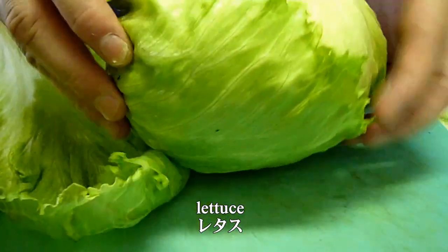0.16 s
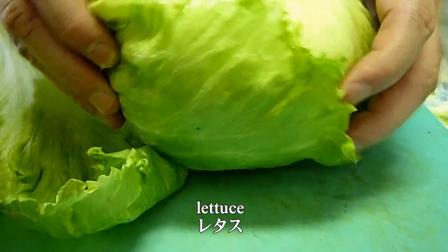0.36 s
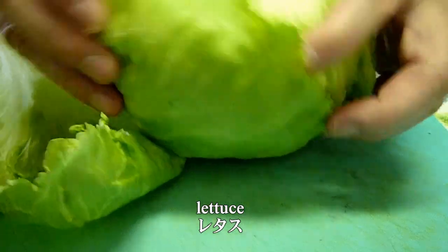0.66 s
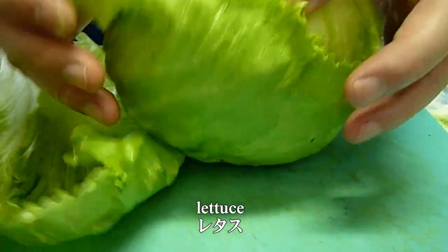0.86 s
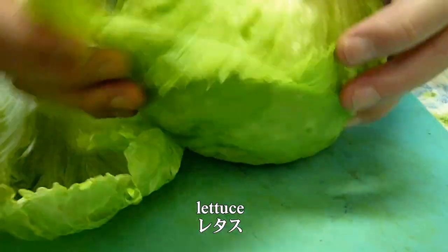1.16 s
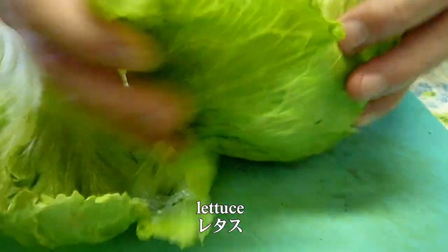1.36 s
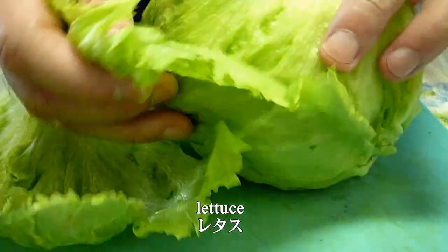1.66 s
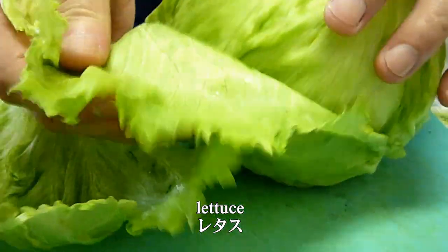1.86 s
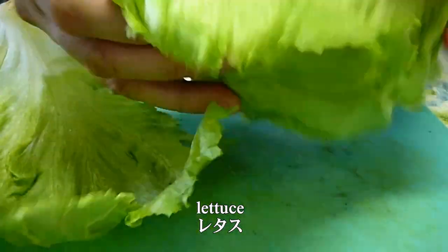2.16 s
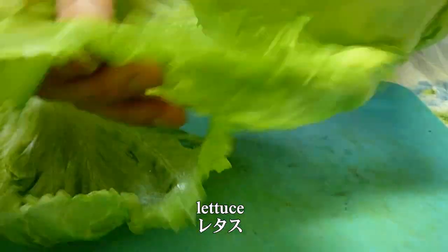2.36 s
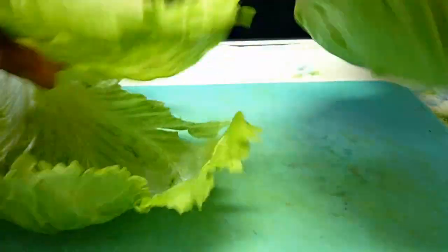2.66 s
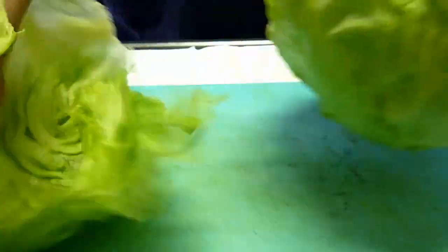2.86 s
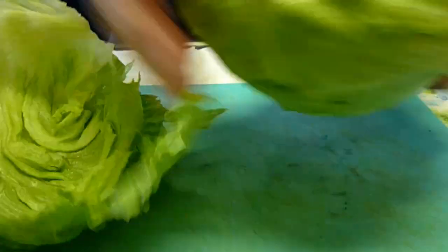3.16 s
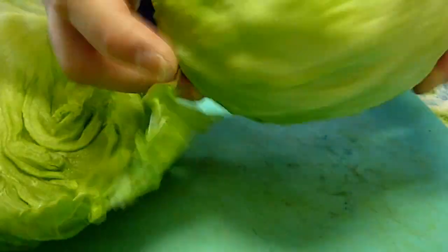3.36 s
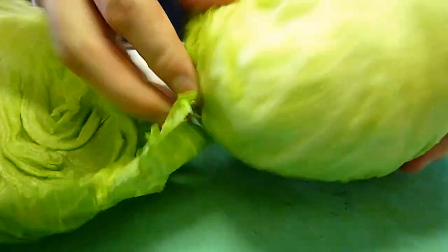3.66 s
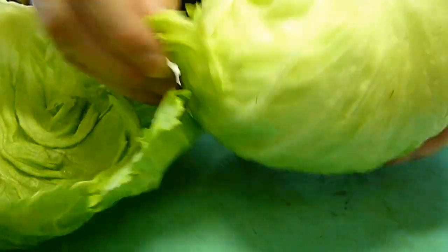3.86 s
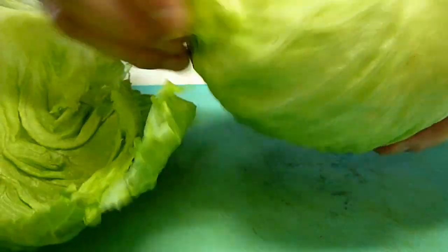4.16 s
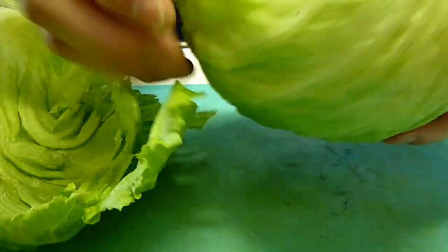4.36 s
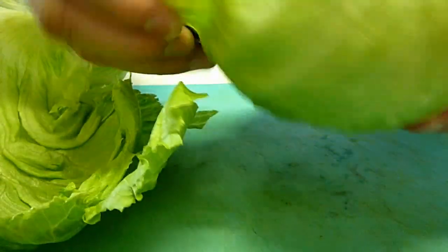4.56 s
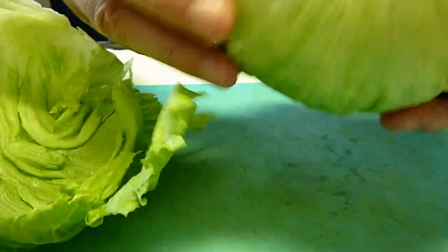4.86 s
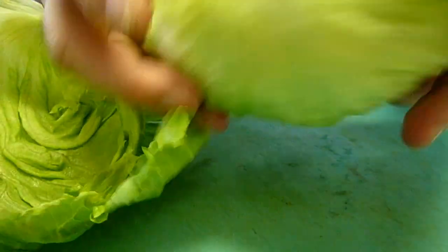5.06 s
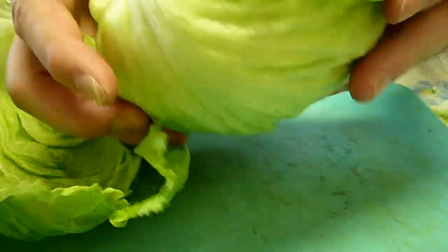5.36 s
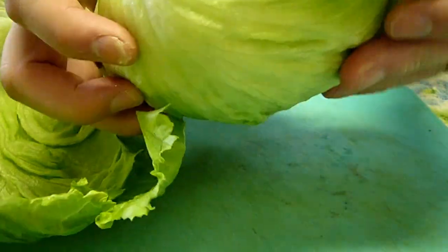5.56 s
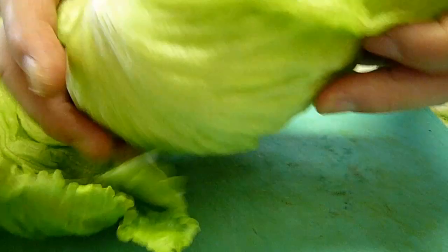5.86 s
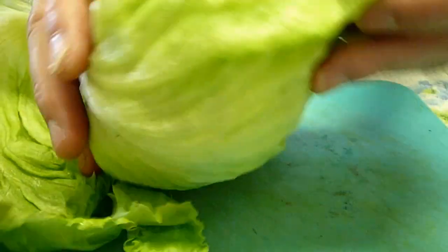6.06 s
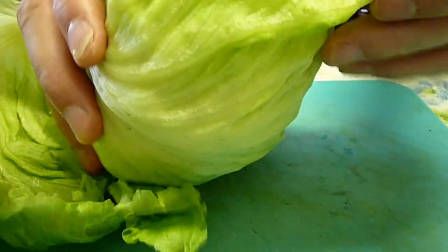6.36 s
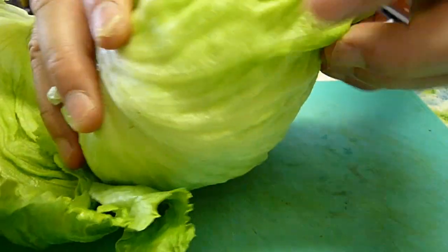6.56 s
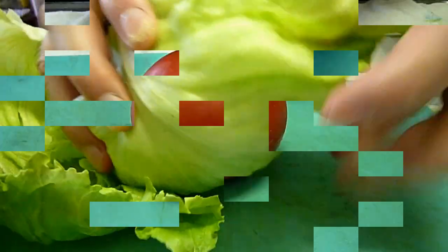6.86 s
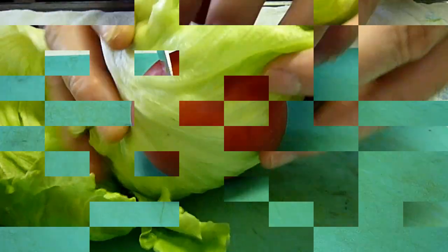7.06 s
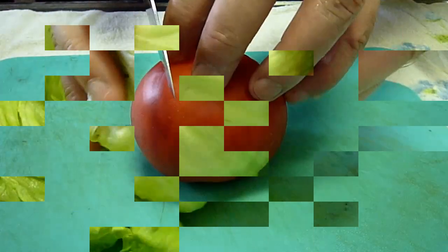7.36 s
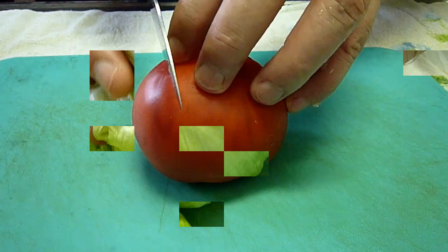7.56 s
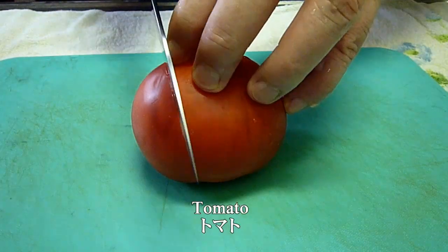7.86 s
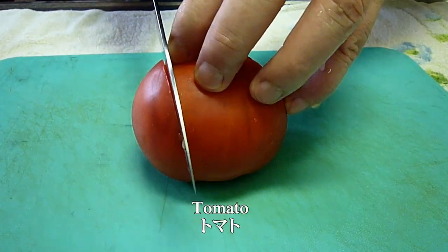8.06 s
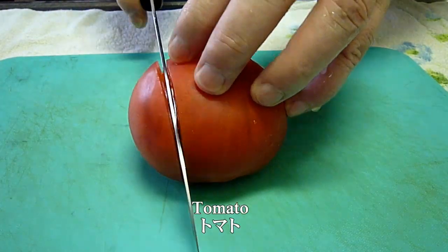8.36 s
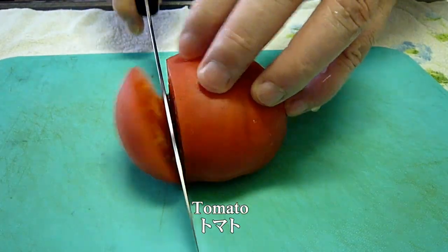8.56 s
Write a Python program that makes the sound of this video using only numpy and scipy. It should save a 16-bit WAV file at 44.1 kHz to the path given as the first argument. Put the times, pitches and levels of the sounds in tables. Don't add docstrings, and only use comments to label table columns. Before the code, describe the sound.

In a small, fairly dry kitchen, lettuce leaves crackle and tear under restless hands, busy at first, then sparser with sharp snaps and a loud brief squeak. The head bumps and groans on the board. The last leaf rips in little jerks. After a brief mute, a quiet blade drags through tomato flesh and ends in a thud and scrape. Steady low hum, slightly gritty compressed camera sound.

```python
import sys
import numpy as np
from scipy import signal
from scipy.fft import rfft, irfft, dct, next_fast_len
from scipy.io import wavfile
from scipy.ndimage import map_coordinates

SR = 44100
rng = np.random.default_rng(int(sys.argv[2]) if len(sys.argv) > 2 else 0)


def wav_out(sig):
    wavfile.write(sys.argv[1], SR, np.round(np.clip(np.atleast_2d(sig).T, -1, 1) * 32767).astype(np.int16))


def rack_gain(trim_db):
    fader = np.asarray(trim_db, float)
    return 10 ** (fader / 20)


N = 384111

# start_s, length_s, creak_db,
# crispness_db
LEAF_PULLS = [(.0, 0.059, -41.5, -9), (0.101, 0.034, -44.5, -3.5), (0.142, 0.012, -48, -7),
              (0.213, 0.012, -50.5, -0.5), (0.264, 0.089, -46, -5.5), (0.458, 0.13, -53, -4.5),
              (0.655, 0.04, -51, -5), (.71, .04, -49, 0), (.76, .04, -52, 0), (0.802, 0.062, -45.5, -4.5),
              (0.882, 0.032, -51.5, -4), (0.96, 0.042, -61.5, 2), (1.064, 0.034, -55, 0),
              (1.144, 0.017, -41, -4), (1.175, 0.038, -44, -4), (1.249, 0.045, -48, -6),
              (1.344, 0.016, -49.5, -5.5), (1.526, 0.047, -37, -5), (1.633, 0.018, -55, 8.5),
              (1.677, 0.13, -55.5, -4), (1.884, 0.023, -48, -6.5), (2.032, 0.035, -56.5, -5.5),
              (2.196, 0.05, -36, -5.5), (2.25, 0.11, -41.5, -3), (2.331, 0.015, -41, -1),
              (2.382, 0.011, -34.5, -4.5), (2.606, 0.14, -63.5, -7), (2.812, 0.053, -56, -8.5),
              (2.882, 0.074, -48.5, -10),
              (3.318, 0.008, -43.5, -7), (3.444, 0.038, -63, 0), (3.655, 0.013, -37, -20.5),
               (3.709, 0.017, -61, 2.5), (3.742, 0.0095, -44.5, 5), (3.749, 0.056, -36, -9),
               (3.91, 0.023, -47.5, -2.5), (3.961, 0.051, -53.5, 1), (4.003, 0.014, -44.5, -4),
               (4.118, 0.031, -63.5, 12.5), (4.208, 0.021, -51, -8), (4.272, 0.044, -50, -1),
               (4.309, 0.023, -39.5, -1.5), (4.531, 0.029, -66, -11), (4.641, 0.0078, -41.5, -3),
               (4.648, 0.034, -48, 2.5), (4.804, 0.066, -50.5, 3), (4.91, 0.023, -50.5, -7),
               (4.967, 0.064, -61, 0.5), (5.24, 0.011, -55.5, 2.5), (5.359, 0.013, -55.5, -10),
              (5.451, 0.016, -56, -2), (5.521, 0.0097, -53.5, -1), (5.581, 0.039, -51.5, -6.5),
              (5.669, 0.019, -48, -8), (5.728, 0.043, -48, -6), (5.832, 0.0084, -49, 1.5),
              (5.919, 0.022, -44.5, -3.5), (5.961, 0.021, -50.5, -6), (6.004, 0.043, -49.5, -3),
              (6.078, 0.018, -45, -4.5), (6.2, 0.04, -52, -7), (6.325, 0.0099, -55, -3),
              (6.384, 0.014, -49, -7.5), (6.42, 0.15, -56, -4), (6.517, 0.026, -53.5, -2),
              (6.712, 0.089, -66.5, 7), (6.786, 0.051, -43, -4.5), (6.885, 0.056, -57, -4),
              (7.082, 0.013, -69, -6), (7.147, 0.012, -56.5, 5), (7.235, 0.048, -50, -3)]
# start_s, length_s, creak_db, crispness_db
SAW_STROKES = [
    (7.965, 0.11, -61, -29),
    (8.28, 0.1, -52, -22),
    (8.476, 0.04, -37, -17.5),
    (8.584, 0.034, -51.5, -23),
    (8.437, .03, -50.5, -25),
    (8.657, 0.065, -49, -7),
]
# start_s, length_s, level_db
SHIFTS_ON_BOARD = [(.0, 0.015, -50.5), (0.107, 0.22, -42), (0.16, 0.027, -47), (0.31, 0.02, -54),
                   (0.56, 0.038, -49.5), (0.625, 0.21, -46), (0.81, 0.029, -46), (1.094, 0.11, -43.5),
                   (1.149, 0.027, -39), (1.319, 0.029, -55), (1.536, 0.065, -42), (1.796, 0.012, -52),
                   (2.191, 0.14, -39), (2.38, 0.024, -39), (3.316, 0.012, -45), (3.659, 0.035, -36.5),
                   (3.769, 0.03, -43.5), (3.942, 0.019, -46.5), (4.303, 0.028, -42.5), (4.66, 0.021, -47),
                   (4.806, 0.21, -49.5), (5.607, 0.22, -49.5), (6.036, 0.039, -54.5), (6.377, 0.039, -50),
                   (6.507, 0.057, -47.5), (7.989, 0.053, -52.5), (8.278, 0.077, -41), (8.462, .06, -40.5),
                   (8.646, 0.099, -47)]
# time_s, level_db
HAND_GRIP = [(0, -54.5), (.4, -55), (.9, -60), (1.4, -62), (1.75, -61), (2.1, -60.5), (2.5, -66),
             (3.0, -66), (3.2, -77), (4.0, -60), (4.45, -69), (5.0, -65), (5.45, -68), (5.9, -63.5),
             (6.6, -68.5), (7.0, -73.5), (7.4, -69), (7.7, -75), (8.7, -62.5)]
# centre_hz, width_hz, boost_db
BOARD_RESONANCES = [(420, 140, 13), (896, 23, 9.5), (1060, 43, -1), (1386, 150, 4), (2515, 200, 4.5),
                    (5130, 1500, 4.5)]
# start_s, peak_db, centre_hz, t60_ms
RIB_SNAPS = [(0.2124, -34, 4630, 35), (0.3055, -35, 2500, 10), (1.144, -25.5, 2560, 31.5),
             (1.3489, -32, 5180, 5.9), (1.5387, -29, 3040, 49), (1.637, -23.5, 4300, 26.4),
             (2.2345, -31, 5130, 27), (3.315, -40.5, 4105, 19), (3.79, -38, 2773, 69),
             (3.9225, -31, 2924, 21), (4.1309, -34, 3510, 11), (4.3115, -20.5, 2850, 19),
             (4.6427, -25, 2680, 35), (4.6712, -36, 2540, 14), (4.8117, -32, 5060, 15),
             (4.8195, -27, 4600, 6), (4.8328, -38, 4010, 33), (4.8526, -36, 6200, 28),
             (5.669, -34, 2200, 11), (5.833, -39.5, 5053, 26.7), (5.9239, -33, 3600, 34),
             (6.0206, -33, 3700, 44.5), (6.3748, -39.5, 3170, 20.6), (6.7657, -16, 4900, 5),
             (6.77, -34, 4200, 30), (6.8237, -28, 3500, 8), (6.8349, -29, 4180, 16),
             (7.146, -38, 2740, 13.6), (7.2796, -21, 5370, 12.3)]
# start_s, peak_db, centre_hz, t60_ms
VEIN_TICKS = [(.0385, -34.5, 1500, 10), (.1077, -39, 2500, 12), (.2598, -42, 2300, 10),
              (.2793, -39.5, 2200, 10), (.2857, -41, 2500, 10), (.3371, -36, 1800, 15),
              (.6559, -40, 2200, 10), (.7233, -42.5, 2610, 10), (.7507, -39.5, 2000, 10),
              (.8475, -44, 1800, 10), (1.1194, -40, 2590, 10), (1.1897, -35.5, 1800, 12),
              (1.5085, -36, 1700, 15), (1.8951, -42, 1600, 12), (2.1794, -36, 3500, 12),
              (2.2175, -30.5, 2500, 8), (2.24, -33.5, 1800, 8), (2.281, -29, 1700, 8),
              (2.3245, -35.5, 1500, 8), (2.339, -33, 1500, 10), (3.702, -38, 2600, 8),
              (3.9706, -41, 1800, 10), (3.997, -42, 1800, 6), (4.008, -40, 1600, 15),
              (4.2026, -43.5, 2500, 8), (4.2734, -42.5, 2000, 10), (4.3225, -31, 2500, 12),
              (4.331, -36, 2300, 10), (4.345, -37.5, 2500, 10), (5.5235, -46, 2300, 10),
              (5.688, -42.5, 1800, 10), (5.7141, -45, 1800, 10), (5.752, -36, 2420, 10),
              (5.8249, -45, 2500, 8), (5.8937, -45, 2580, 10), (5.9655, -42, 2000, 12),
              (5.985, -47, 2500, 8), (6.05, -49, 2500, 10), (6.0813, -32, 2000, 14), (6.208, -43, 1800, 12),
              (6.3207, -48, 2830, 10), (7.1515, -39, 3000, 8)]
# start_s, peak_db, pitch_hz, t60_ms
WET_POPS = [(0.037, -47, 968, 110), (0.15, -21.5, 1295, 26), (0.214, -26, 700, 14), (0.8116, -29, 1100, 24),
            (1.153, -28, 1650, 37), (1.155, -25.5, 2675, 18), (4.312, -37, 1190, 28),
            (1.582, -29.5, 517, 110), (2.199, -38, 910, 97), (2.227, -26, 1186, 53), (2.322, -42, 1370, 44),
            (2.382, -33, 1660, 53), (.306, -45, 696, 40), (3.316, -37, 1120, 31), (3.657, -19, 1275, 18),
            (2.228, -30, 800, 40), (2.206, -31, 950, 40), (3.791, -27, 924, 24), (4.01, -41, 1105, 69),
            (4.633, -24.5, 617, 100), (5.669, -41.5, 860, 22), (5.752, -37.5, 824, 12),
            (6.081, -45.5, 645, 26), (6.379, -33, 644, 25), (6.9, -42.5, 442, 36), (7.082, -49, 500, 43),
            (8.59, -44, 1200, 33), (6.383, -36.5, 1970, 18)]
# start_s, peak_db, pitch_hz, t60_ms, spread_octaves
LEAF_SQUEAKS = [
    (4.6437, -14.5, 1419, 23, 0.049),
    (4.2025, -39, 3800, 30, .05),
    (4.139, -34, 3500, 70, .03),
]
# start_s, length_s, peak_db, first_hz, last_hz
STICK_SLIPS = [(0.01, 0.046, -49, 1098, 1010), (1.53, 0.031, -16.5, 400, 460),
               (1.544, 0.037, -14.5, 283.5, 285), (1.546, .034, -25.5, 592, 552),
               (1.551, 0.037, -31.5, 878, 890), (1.53, 0.043, -34, 1716, 1467),
               (2.193, .018, -29.5, 2450, 2420), (2.381, 0.014, -27.5, 1552, 1520),
               (2.383, .013, -39, 2260, 2240), (2.398, 0.0092, -29.5, 1620, 1580),
               (3.7335, .011, -29, 4180, 4230), (3.732, 0.0074, -32, 2530, 2500),
               (3.738, 0.017, -25, 2456, 2520), (3.756, 0.014, -36, 2560, 2420),
               (3.753, 0.027, -25.5, 898, 850), (3.773, 0.017, -23.5, 900, 960),
               (3.762, 0.014, -27, 1383, 1412), (3.777, .028, -27.5, 1320, 1230),
               (3.785, .018, -21, 956, 913), (3.797, .01, -25, 969, 950), (3.808, 0.013, -33, 830, 900),
               (4.129, .01, -27, 3450, 3436), (5.762, 0.032, -38, 910, 858), (5.915, 0.03, -33, 1060, 1062),
               (5.918, .024, -35, 1910, 1925), (5.921, 0.016, -43, 3670, 3570),
               (6.779, 0.019, -41, 1007, 990), (6.803, 0.021, -44.5, 610, 590),
               (6.809, .02, -35, 1740, 1790), (6.833, 0.0081, -36, 1347, 1340),
               (7.239, 0.011, -42.5, 1430, 1390), (7.255, 0.025, -42, 1415, 1400),
               (8.28, 0.07, -47, 1110, 1061), (8.317, 0.092, -30, 239.6, 240),
               (8.489, 0.011, -23, 1200, 1200), (8.489, .011, -30.5, 1946, 1916),
               (8.662, 0.043, -42.5, 1664, 1577),
               (4.831, .012, -33, 3850, 3900), (4.833, .012, -40, 2000, 2200),
                    (4.85, .013, -35, 5000, 5000), (4.85, .012, -35, 7350, 7350),
                    (4.849, .01, -38, 6400, 6400), (4.851, .01, -39, 8700, 8700),
                    (4.85, .014, -39, 2400, 2500), (4.655, .01, -35, 4000, 3900),
                    (4.225, .018, -46, 3750, 3750), (4.31, .006, -30, 5200, 5200),
                    (4.322, .012, -36, 2900, 2500), (5.612, .02, -41, 480, 480),
                    (3.662, .009, -21, 1250, 1200), (3.669, .014, -21, 1150, 1050),
                    (8.497, .022, -10, 185, 165), (6.925, .02, -50, 3500, 3500)]
# start_s,
# peak_db, pitch_hz, t60_ms, spread_octaves
HOLLOW_GROANS = [
    (2.262, -32, 427, 120, 0.052),
    (2.292, -36, 420, 120, 0.055),
    (2.325, -33, 420, 120, 0.06),
    (8.329, -51, 450, 216, 0.042),
    (8.496, -24, 448, 55, 0.011),
]
# start_s, peak_db, pitch_hz, t60_ms, upper_mode_db
BOARD_BUMPS = [(.212, -35, 380, 24, 8), (0.575, -32, 170, 51, -6.5), (0.899, -32, 420, 36, -31),
               (1.519, -28, 400, 36, -3), (3.3, -22.5, 330, 50, -3), (3.3138, -20.5, 199, 26, -9),
               (3.666, -24, 163, 72, 0.5), (3.787, -23.5, 410, 30, -8), (4.663, -31, 170, 31, 21),
               (8.021, -35.5, 250, 120, -27), (8.46, -26, 240, 220, -36.5), (8.512, -21, 160, 80, -6),
               (.152, -30, 200, 90, -5), (8.148, -42, 139, 155, -9), (7.991, -36, 130, 68, -8.5)]
# start_s, peak_db, pitch_hz, rise_ms, t60_ms, spread_octaves
BLADE_KNOCKS = [
    (8.4925, -24, 1483, 0.24, 27, 0.49),
]
# frequency_hz, t60_s
ROOM_DECAY = [(150, 0.14), (1500, 0.12), (12000, 0.13)]
# pitch_hz, width_hz, level_db (rms)
FRIDGE_OVERTONES = [(124.5, 4.6, -66), (179.8, 19, -61), (240, 10, -63.5)]
# frequency_hz, level_db (per Hz)
AIR_TONE = [(20, -16.5), (95, -6.5), (150, 3.5), (420, 1.5), (620, -19.5), (1100, -9), (2000, -16.5),
            (16000, -21)]
# centre_hz, width_hz, boost_db
MIC_PORT = [(7633, 1500, -4.5), (11060, 1500, 3.5), (14320, 4000, 6)]
# time_s, gain
SCENE_CHANGE = [
    (7.74194, 1),
    (7.74196, 0),
    (7.801, 0),
    (7.8055, .15),
    (7.807, .33),
    (7.822, 1),
]

CONVERTER_OFFSET = -.0612


def along(points, hz):
    f, value = np.transpose(points)
    return np.interp(np.log(hz + 1), np.log(f + 1), value)


def unit(x):
    return x / np.sqrt(np.mean(x ** 2) + 1e-20)


def filtered(x, gain):
    m = next_fast_len(N + 8192)
    return irfft(rfft(x, m) * gain(np.fft.rfftfreq(m, 1 / SR)), m)[:N]


def coloured(x, gain):
    return unit(filtered(x, gain))


def resonance(f, centre_hz, width_hz):
    return 1 / (1 + (2 * (f - centre_hz) / width_hz) ** 2)


def boosts(peaks, f):
    return rack_gain(sum(db * resonance(f, hz, width_hz) for hz, width_hz, db in peaks))


def add(track, start_s, peak_db, sound):
    part = track[round(start_s * SR):][:len(sound)]
    part += rack_gain(peak_db) * sound[:len(part)] / np.abs(sound).max()


def swell(t, rise_ms, t60_ms):
    return (1 - np.exp(-1000 * t / rise_ms)) ** 2 * rack_gain(-60000 * t / t60_ms)


def strokes(starts, lengths, levels_db, rise_db_per_s, fall_db_per_s):
    grid = np.arange(0, N / SR + .002, .002)
    t = grid - starts[:, None]
    rise_db = rise_db_per_s * t
    fall_db = fall_db_per_s * (lengths[:, None] - t)
    edge_db = np.minimum(0, np.minimum(rise_db, fall_db))
    power = rack_gain(2 * (levels_db[:, None] + edge_db)).sum(axis=0)
    return np.interp(np.arange(N) / SR, grid, power)


def jerks():
    depth_db, jerks_per_s = 2.6, 130
    steps = np.arange(N) * jerks_per_s / SR
    return unit(rack_gain(depth_db * map_coordinates(rng.standard_normal(2048), [steps], mode="wrap")))


def grains(count, hz, spread, cycles, scatter_db, lo_hz, hi_hz):
    when, size = rng.random((count, 2)).T
    pitch = np.clip(hz * 2 ** (spread * rng.standard_normal((count, 1))), lo_hz, hi_hz)
    t = np.arange(int(4 * cycles * SR / hz)) / SR
    strength = rack_gain(-scatter_db * np.log(np.maximum(size, .04)))
    rings = np.sin(2 * np.pi * pitch * t) * np.exp(-t * pitch / cycles) * strength[:, None]
    where = (when * N).astype(int)[:, None] + np.arange(len(t))
    x = np.bincount(where.ravel(), rings.ravel(), N)[:N]
    return coloured(x, lambda f: boosts(BOARD_RESONANCES, f) / (1 + (lo_hz / (f + 1)) ** 4) / (1 + (f / hi_hz) ** 4))


def rustle():
    all_pulls = LEAF_PULLS + SAW_STROKES
    start_s, length_s, pull_db, crisp_db = np.transpose(all_pulls)

    def pulls(db):
        return strokes(start_s, length_s, db, rise_db_per_s=904, fall_db_per_s=597.5)

    grip = rack_gain(2 * np.interp(np.arange(N) / SR, *np.transpose(HAND_GRIP)))
    shifts = strokes(*np.transpose(SHIFTS_ON_BOARD), rise_db_per_s=508, fall_db_per_s=300.5)
    fizz_db = pull_db + crisp_db
    sizzle_db = fizz_db - 8 + .7 * crisp_db
    top_db = fizz_db - 15.5 + 0.52 * crisp_db + 0.15 * (pull_db + 54.5)

    creak = grains(count=9000, hz=1193.0, spread=0.67, cycles=6, scatter_db=3.2, lo_hz=552, hi_hz=2280)
    rub = grains(count=2500, hz=249.5, spread=.65, cycles=2.8, scatter_db=2.5, lo_hz=112, hi_hz=517)
    fizz = grains(count=20000, hz=2911, spread=0.41, cycles=6, scatter_db=3.2, lo_hz=1980, hi_hz=4020)
    sizzle = grains(count=20000, hz=5200, spread=.35, cycles=4.5, scatter_db=3.5, lo_hz=3960, hi_hz=6533)
    top = grains(count=14000, hz=9470, spread=0.42, cycles=5.5, scatter_db=3.5, lo_hz=6100, hi_hz=15300)

    creak *= jerks() * rack_gain(-4) * np.sqrt(pulls(pull_db) + grip)
    rub *= rack_gain(-2.5) * np.sqrt(shifts + rack_gain(2 * 2) * grip)
    fizz *= rack_gain(-5.0) * np.sqrt(pulls(fizz_db) + rack_gain(2 * -13) * grip)
    sizzle *= np.sqrt(pulls(sizzle_db) + rack_gain(-160))
    top *= np.sqrt(pulls(top_db) + rack_gain(-146))
    return creak + rub + jerks() * (fizz + sizzle + top)


def fibres(rows, count, loose):
    track, t = np.zeros(N), np.arange(SR // 10) / SR
    draws = rng.standard_normal((len(rows), count, 2))
    for (start_s, peak_db, hz, rise_ms, t60_ms, spread), draw in zip(rows, draws):
        detune = draw[:, :1] - draw[:, 0].mean()
        pitch = np.minimum(hz * 2 ** (spread * detune), 14000)
        bundle = np.sin(2 * np.pi * pitch * t + loose * draw[:, 1:]).sum(axis=0)
        add(track, start_s, peak_db, swell(t, rise_ms, t60_ms) * bundle)
    return track


def snaps():
    rows = [(s, db + 4.5, hz, .05, t60_ms, .26 + .009 * t60_ms) for s, db, hz, t60_ms in RIB_SNAPS]
    return fibres(rows, count=40, loose=.8)


def pops():
    rows = [(s, db, hz, .6, t60_ms, .16) for s, db, hz, t60_ms in WET_POPS]
    return fibres(rows, count=8, loose=0.72)


def ticks():
    rows = [(s, db + 4.5, hz, .05, t60_ms, .5) for s, db, hz, t60_ms in VEIN_TICKS]
    return fibres(rows, count=24, loose=0.55)


def squeaks():
    rows = [(s, db, hz, 1, t60_ms, spread) for s, db, hz, t60_ms, spread in LEAF_SQUEAKS]
    return fibres(rows, count=3, loose=0.5)


def slips():
    roundness, shake, shake_cycles = 1.7, .45, 4
    track, rows = np.zeros(N), STICK_SLIPS
    draws = rng.standard_normal((len(rows), 2, 64))
    for (start_s, length_s, peak_db, first_hz, last_hz), draw in zip(rows, draws):
        t = np.arange(int(length_s * SR)) / SR
        steps = t * first_hz / shake_cycles
        size, turn = (shake * map_coordinates(d, [steps], mode="wrap") for d in draw)
        glide = first_hz * t + (last_hz - first_hz) * t ** 2 / (2 * length_s)
        envelope = np.sin(np.pi * t / length_s) ** roundness * np.exp(size / 2)
        add(track, start_s, peak_db, envelope * np.sin(2 * np.pi * glide + turn))
    return track


def groans():
    rows = [(s, db, hz, 9.6, t60_ms, spread) for s, db, hz, t60_ms, spread in HOLLOW_GROANS]
    return fibres(rows, count=4, loose=0.62)


def bumps():
    track, t = np.zeros(N), np.arange(SR // 5) / SR
    for start_s, peak_db, hz, t60_ms, upper_db in BOARD_BUMPS:
        low = np.sin(2 * np.pi * hz * t)
        upper = rack_gain(upper_db) * np.sin(2 * np.pi * 1.48 * hz * t)
        add(track, start_s, peak_db, -swell(t, 0.2 * t60_ms, t60_ms) * (low + upper))
    return track


def blade():
    return fibres(BLADE_KNOCKS, count=20, loose=0.77)


def kitchen(x):
    hz, t, z = signal.stft(rng.standard_normal(SR // 3), SR, nperseg=256)
    decay = rack_gain(-60 * t / along(ROOM_DECAY, hz)[:, None])
    tail = signal.istft(z * decay, SR, nperseg=256)[1]
    delayed = np.pad(x, (130, 0))
    return signal.fftconvolve(delayed, tail / np.linalg.norm(tail))[:N]


def hum():
    t = np.arange(N) / SR
    background = rack_gain(-59) * coloured(rng.standard_normal(N), lambda f: rack_gain(along(AIR_TONE, f)))
    for hz, width_hz, level_db in FRIDGE_OVERTONES:
        background += rack_gain(level_db) * coloured(rng.standard_normal(N), lambda f: resonance(f, hz, width_hz))
    motor = rack_gain(-55.5) * np.sin(2 * np.pi * 60 * t)
    whine = rack_gain(-74.5) * np.sin(2 * np.pi * 8000 * t)
    return background + motor + whine


def scene():
    events = snaps() + pops() + ticks() + squeaks() + slips() + groans() + bumps() + blade()
    return (events + rack_gain(-14) * kitchen(events) + rustle() + hum())[None]


def camera(x):
    step, frame, lead = rack_gain(-41.3), 1024, 610
    up, down, half = 160, 147, frame // 2
    fast = signal.resample_poly(x, up, down, padtype="edge")
    fast = np.pad(fast, (lead + frame, 2 * frame), "edge")
    count = len(fast) // frame - 1
    window = np.sin(np.pi * (np.arange(2 * frame) + .5) / (2 * frame))
    frames = fast[np.arange(count)[:, None] * frame + np.arange(2 * frame)] * window
    a, b, c, d = (frames[:, k * half:(k + 1) * half] for k in range(4))
    lines = dct(np.hstack([-c[:, ::-1] - d, a - b[:, ::-1]]), type=4, norm="ortho") / step
    lines = np.sign(lines) * np.floor(np.abs(lines) ** .75 + .4054) ** (4 / 3)
    p, q = np.hsplit(dct(lines * step, type=4, norm="ortho"), 2)
    heads = np.hstack([q, -q[:, ::-1]]) * window[:frame]
    tails = np.hstack([-p[:, ::-1], -p]) * window[frame:]
    joined = (heads[1:] + tails[:-1]).ravel()[lead:]
    return signal.resample_poly(joined, down, up, padtype="edge")[:N]


def band_limit(x):
    return signal.sosfilt(signal.butter(12, 15110, fs=SR, output="sos"), x)


def record(dry):
    heard = filtered(dry[0], lambda f: boosts(MIC_PORT, f))
    time_s, gain = np.transpose(SCENE_CHANGE)
    fade = np.interp(np.arange(N) / SR, time_s, gain)
    mix = camera(heard + CONVERTER_OFFSET)[None] * fade
    return band_limit(mix)


dry = scene()
out = record(dry)
wav_out(out)
```